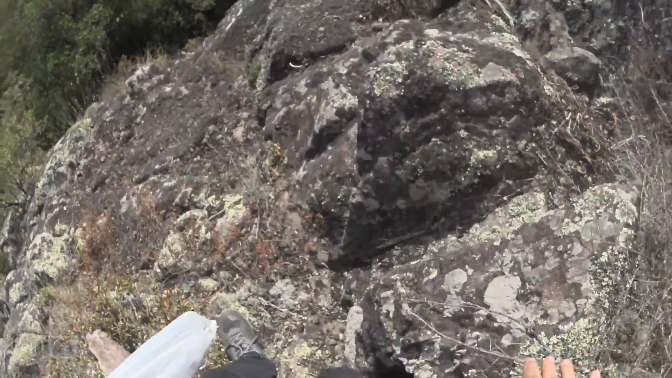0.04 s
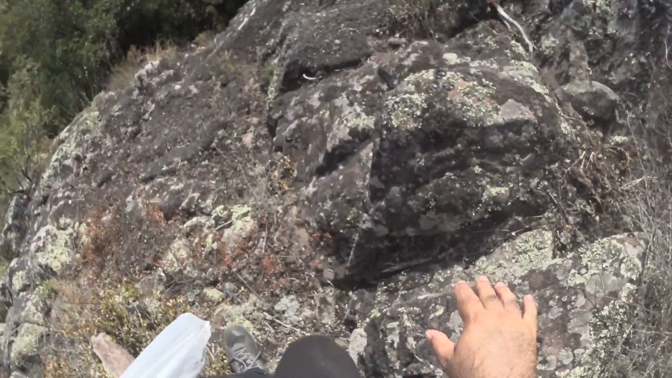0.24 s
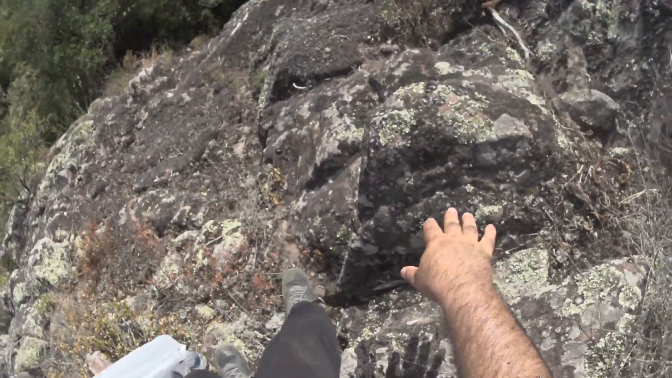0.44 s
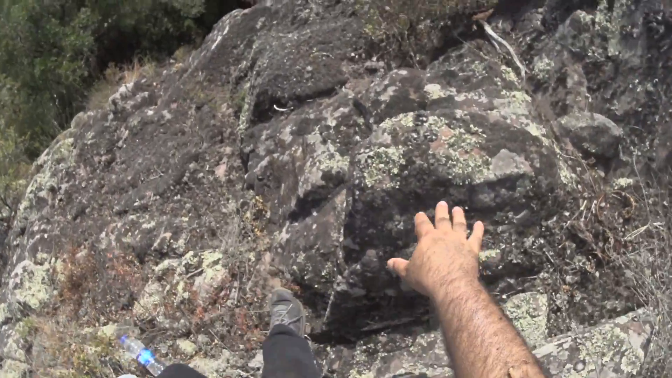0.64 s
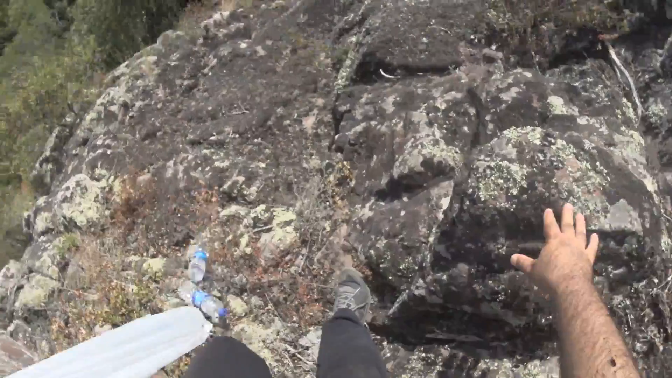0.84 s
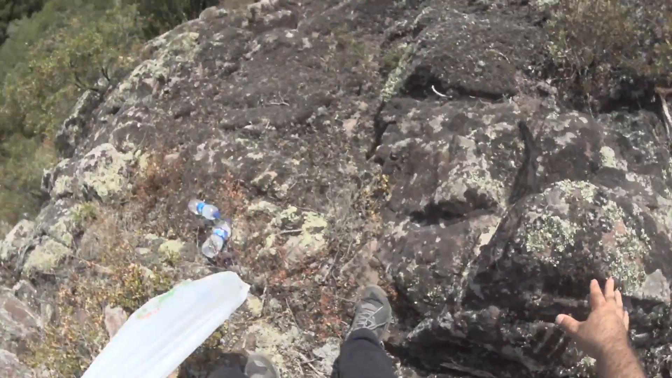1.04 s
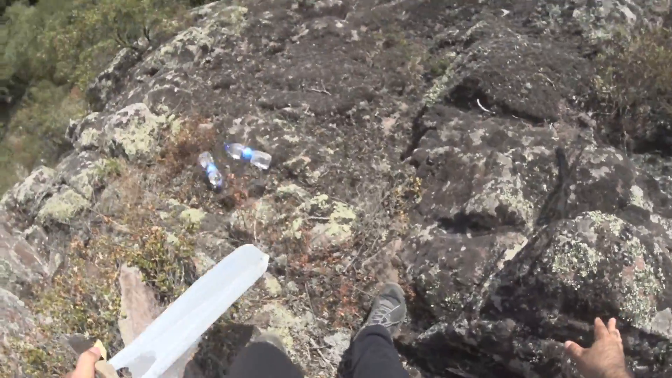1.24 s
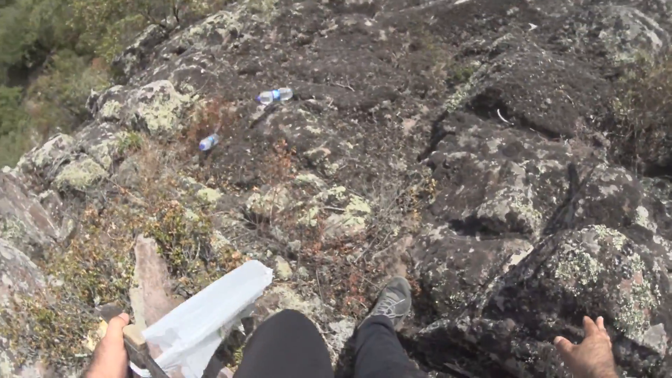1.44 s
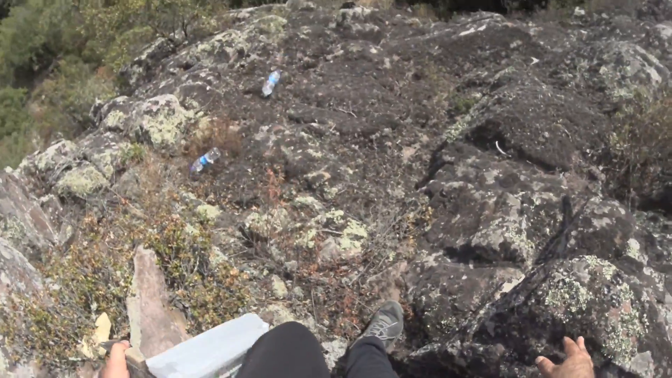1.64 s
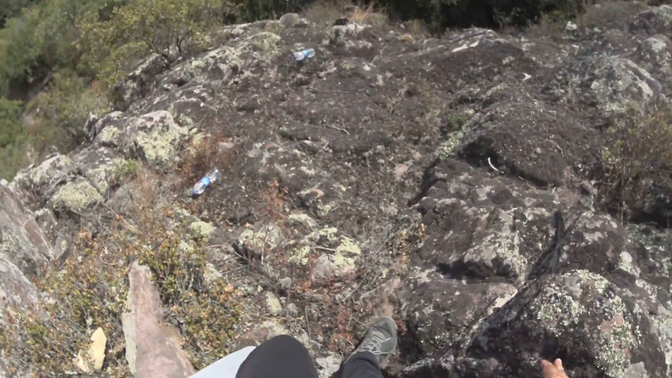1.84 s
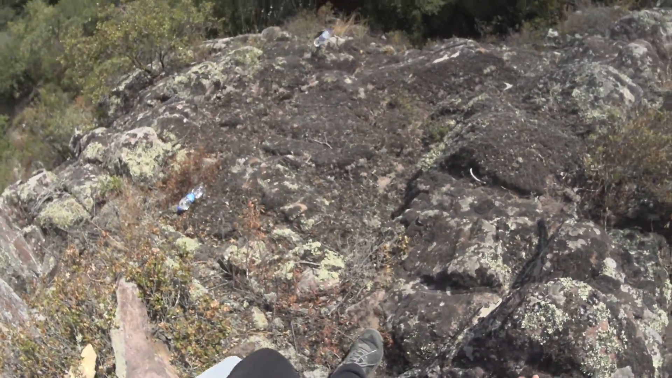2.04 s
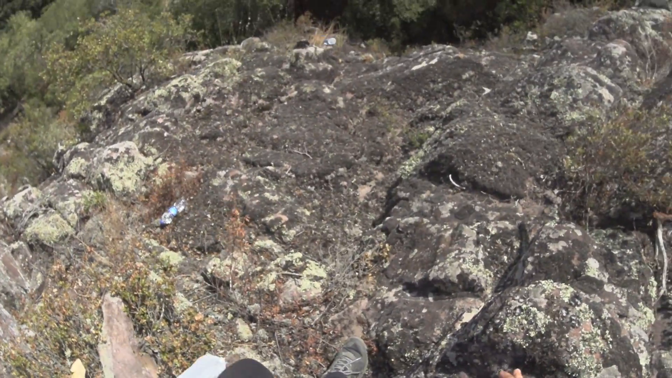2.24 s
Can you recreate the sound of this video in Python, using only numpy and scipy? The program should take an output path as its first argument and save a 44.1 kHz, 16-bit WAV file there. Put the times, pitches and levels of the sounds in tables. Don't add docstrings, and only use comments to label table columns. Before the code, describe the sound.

Empty plastic bottles tumble down rock, close to a small head-worn microphone. Bag film crackles softly, then hollow knocks and creasing snaps cluster at 0.2-0.3 s, with a snap at 0.42. Denser rustle, scuffs and ringing panel pings run 0.65-1.2, sharpest crack near 1.13. A clack at 1.45, then separate bounces around 1.7 and 1.95 fade into faint breeze and a distant drone, with short rock echoes.

```python
import sys
import numpy as np
from scipy import signal
from scipy.io import wavfile
from scipy.ndimage import uniform_filter1d

SR = 44100
rng = np.random.default_rng(int(sys.argv[2]) if len(sys.argv) > 2 else 0)


def field_ratio(decibels):
    return 10 ** (np.asarray(decibels, dtype=float) / 20)


def transcribe(u):
    v = np.clip(np.atleast_2d(u).T, -1, 1)
    q = np.round(v * 32767).astype(np.int16)
    wavfile.write(sys.argv[1], SR, q)


N = 101430

# (frequency [Hz], level [dB])
GRIT_COLOUR = [(50, -22), (150, -34), (400, -2.5), (1300, -5.5), (2300, -5.5), (5000, -4), (10500, -5)]


def evened(x):
    return x / np.sqrt(np.mean(x ** 2) + 1e-20)


def read(points, hz):
    f, value = np.transpose(points)
    return np.interp(np.log(hz + 1), np.log(f + 1), value)


def level(curve):
    s, db = np.transpose(curve)
    return field_ratio(np.interp(np.arange(N) / SR, s, db))


def add(mix, s, sound):
    part = mix[round(s * SR):][:len(sound)]
    part += sound[:len(part)]


def colour(x, points):
    log_gain = np.log(field_ratio(read(points, abs(np.fft.fftfreq(4096, 1 / SR)))))
    minimum_phase = np.exp(np.conj(signal.hilbert(log_gain)))
    taps = np.fft.ifft(minimum_phase).real[:2048]
    return signal.oaconvolve(x, taps)[:len(x)]


def resonate(x, hz, width_hz):
    r = np.exp(-np.pi * width_hz / SR)
    gain = (1 - r * r) / 2
    return signal.lfilter([gain, 0, -gain], [1, -2 * r * np.cos(2 * np.pi * hz / SR), r * r], x)


def resonate_twice(x, hz, width_hz):
    return resonate(resonate(x, hz, width_hz), hz, width_hz)


def treble(x, db):
    high = signal.lfilter(*signal.butter(2, 4500, "high", fs=SR), x)
    return x + (field_ratio(db) - 1) * high


def crackle(per_s, spread_db, smooth):
    happens = np.clip(per_s - rng.random(N) * SR, 0, 1)
    size_db = spread_db * np.minimum(rng.exponential(1, N), 4)
    clicks = happens * field_ratio(size_db) * rng.standard_normal(N)
    hiss = rng.standard_normal(N)
    drift = uniform_filter1d(uniform_filter1d(rng.standard_normal(N), size=90), size=90)
    clumps = field_ratio(1.9 * evened(drift))
    return evened((evened(clicks) + smooth * hiss) * clumps)


def knocks():
    # (time [s], level [dB], pitch [Hz], time to fall 60 dB [s])
    blows = [(.165, -42, 1024, 0.066), (0.2001, -29, 900, 0.033), (.2121, -33.5, 898.1, 0.036),
             (0.2273, -28, 980, 0.021), (.2395, -36, 950, 0.054), (.273, -33, 983, 0.058),
             (.408, -41.5, 425, 0.058), (0.4198, -36.5, 1115, .04), (.499, -43, 880, 0.037),
             (0.5008, -40.5, 481, 0.12), (.53, -49, 483, 0.079), (.641, -42.5, 710, 0.09),
             (.653, -40.5, 787, 0.057), (.666, -42, 600, .05), (.681, -36.5, 542, 0.072),
             (.696, -37, 962, 0.067), (0.7409, -40, 299, 0.13), (.7415, -34.5, 947, 0.054),
             (.915, -45.5, 564, 0.16), (0.926, -47.5, 215, 0.19), (.95, -44, 790, 0.071),
             (1.03, -39, 580, .06), (1.069, -35.5, 555, 0.063), (1.1218, -38.5, 1140, 0.16),
             (1.1228, -34, 409, 0.088), (1.181, -38, 988, 0.089), (1.183, -39, 190, 0.1),
             (1.225, -44.5, 803, 0.052), (1.261, -43, 1375, .05), (1.288, -42, 524, 0.095),
             (1.3, -55, 202, 0.16), (1.415, -43.5, 884, 0.11), (1.4515, -33.5, 1070, 0.068),
             (1.452, -37.5, 247, 0.073), (1.699, -46.5, 239, 0.17), (1.734, -40.5, 825, 0.1),
             (1.745, -40.5, 1290, 0.063), (1.79, -54.5, 201, 0.19), (1.835, -51, 840, 0.053),
             (1.944, -38.5, 878, 0.11), (1.946, -42, 267, 0.086), (1.99, -43, 557, 0.14),
             (2.02, -53, 230, 0.14)]
    out, t = np.zeros(N), np.arange(8000) / SR
    for s, db, hz, t60 in blows:
        fall = field_ratio(-60 * t / t60) * (1 - np.exp(-t * hz / 1.17))
        smear = evened(resonate_twice(rng.standard_normal(len(t)), hz, 0.66 * hz))
        clean_share = 0.8 + 50 * t60 ** 2
        ring = clean_share * np.sin(2 * np.pi * hz * t)
        strength = field_ratio(db) * np.sqrt(np.mean(fall ** 2))
        add(out, s, strength * evened(fall * (ring + smear)))
    return out


def pings():
    # (time [s], peak level [dB], pitch [Hz], time to fall 60 dB [s])
    flicks = [(0.2703, -32, 2750, 0.015), (0.2725, -36, 3410, 0.031), (.3003, -31, 2700, 0.019),
              (.495, -39.5, 1027, 0.08), (0.697, -38, 2730, 0.033), (.711, -38, 2480, 0.026),
              (0.741, -35, 2850, 0.015), (.7455, -28.5, 3670, 0.032), (0.756, -31.5, 1150, 0.058),
              (.858, -36, 2200, 0.036), (0.876, -36, 2080, .04), (0.89, -29.5, 2880, 0.027),
              (0.906, -30.5, 2140, 0.027), (.913, -26, 1970, 0.018), (0.928, -35, 2800, .02),
              (1.067, -27.5, 3010, 0.016), (1.08, -30, 2120, 0.038), (1.121, -25, 2017, 0.06),
              (1.184, -38.5, 1066, 0.056), (1.454, -26, 2155, .04), (1.697, -33, 1646, 0.04),
              (1.699, -30.5, 2310, 0.04), (1.7287, -28, 3150, 0.033), (1.7366, -28.5, 3080, 0.022),
              (1.857, -51, 1950, 0.023), (1.9217, -45, 6730, 0.018), (1.94, -35.5, 2420, 0.015),
              (1.948, -33.5, 2156, 0.024), (1.9858, -28.5, 2390, .035), (1.992, -31.5, 2477, 0.026),
              (2.004, -26.5, 1970, 0.02), (.2, -36, 3520, 0.021), (0.242, -38, 1936, 0.044)]
    rise_s, sharpness, rough_share = 0.0008, 4.5, 0.9
    out, t = np.zeros(N), np.arange(3000) / SR
    for s, db, hz, t60 in flicks:
        rough = evened(resonate_twice(rng.standard_normal(len(t)), hz, hz / sharpness))
        swell = field_ratio(db - 60 * t / t60) * (1 - np.exp(-t / rise_s))
        add(out, s, swell * (np.sin(2 * np.pi * hz * t) + rough_share * rough))
    return out


def scuffs():
    # (time [s], length [s], level [dB], ring pitch [Hz], treble [dB])
    drags = [(0.266, 0.011, -53, 3140, -8), (0.295, 0.007, -56, 2780, -6.5),
             (0.306, 0.027, -52.5, 3200, 2.5), (0.482, 0.022, -51.5, 3820, 1),
             (0.685, 0.027, -49.5, 2640, -7), (0.713, 0.014, -58.5, 2600, -13),
             (0.735, 0.021, -46, 2220, 2), (0.846, 0.014, -49.5, 2160, 11), (0.87, 0.032, -46.5, 2580, -1),
             (0.898, 0.025, -51.5, 2160, 6.5), (1.057, 0.027, -42.5, 2300, -1.5),
             (1.114, 0.017, -40, 2220, 6.5), (1.175, 0.023, -50, 2770, -10), (1.273, 0.017, -53, 2500, 6.5),
             (1.285, 0.016, -63, 4500, -10), (1.373, 0.031, -54, 2390, 0.5),
             (1.446, 0.014, -42.5, 2150, -6), (1.485, 0.028, -53, 6050, 9.5), (1.693, 0.01, -51, 1710, 2.5),
             (1.703, 0.012, -57.5, 2160, -22), (1.723, 0.0088, -47.5, 3130, -2.5),
             (1.731, .008, -49, 1940, 1.5), (1.844, 0.013, -64.5, 2020, 2), (1.934, 0.026, -51.5, 1890, -4),
             (1.98, 0.011, -51, 2240, -6), (1.994, 0.0076, -52.5, 1720, 1.5)]
    # (frequency [Hz], width [Hz], level [dB])
    wall_modes = [(1115, 106, 2), (1965, 2100, 1), (2630, 100, 1), (4150, 400, -7.5), (5500, 240, -13),
                  (5910, 510, -12)]
    rise_s, rise_share, release_t60_s = 0.0031, 0.14, 0.039
    wall_db, ring_db = -1, 1
    out, grit = np.zeros(N), crackle(per_s=8300, spread_db=2.0, smooth=0.66)
    for s, length, db, hz, treble_db in drags:
        t = np.arange(0, length + 0.052, 1 / SR)
        rise = np.minimum(t / (rise_s + rise_share * length), 1) ** 2
        release = field_ratio(-60 * np.maximum(t - length, 0) / release_t60_s)
        drive = grit[round(s * SR):][:len(t)] * rise * release
        wall = sum(field_ratio(mode_db) * resonate(drive, f, width) for f, width, mode_db in wall_modes)
        scrape = treble(colour(drive, GRIT_COLOUR) + field_ratio(wall_db) * wall, treble_db)
        sound = scrape + field_ratio(ring_db) * resonate(drive, hz, 440.0)
        add(out, s, field_ratio(db) * evened(sound) * np.sqrt(len(t) / (length * SR)))
    return out


def rolling():
    # (time [s], level [dB])
    strength = [(0, -57), (.4, -58.5), (.7, -52), (1.0, -51.5), (1.4, -53.5), (1.7, -64.5), (2.3, -63)]
    # (frequency [Hz], level [dB])
    tone = [(60, -23), (150, -3.5), (250, 2), (550, 3), (1000, 4), (1500, -5), (3000, -42)]
    return level(strength) * evened(colour(crackle(per_s=600, spread_db=2.5, smooth=1.8), tone))


def snaps():
    # (time [s], peak level [dB], centre pitch [Hz])
    creases = [(.066, -30.5, 2640), (0.084, -36, 2700), (0.1642, -32, 2970), (0.19, -29, 3220),
               (0.1997, -21.5, 2720), (0.211, -24.5, 4170), (0.225, -30, 1820), (0.239, -26.5, 2040),
               (0.2709, -31, 2960), (0.3002, -39, 3400), (0.359, -32.5, 3200), (0.381, -32.5, 7000),
               (0.405, -26, 2470), (0.4182, -19, 2630), (0.451, -41, 3780), (.567, -37.5, 3780),
               (0.632, -32.5, 6900), (0.676, -28, 6100), (.682, -25.5, 3380), (.835, -34, 8500),
               (0.894, -22, 6400), (0.905, -23, 3860), (1.027, -23, 7960), (1.1278, -10, 2550),
               (1.141, -27, 2850), (1.283, -29, 6540), (1.377, -30.5, 7550), (1.469, -28, 7950),
               (1.8302, -33.5, 4200), (1.921, -44, 4000), (1.8297, -32, 10300), (1.829, -40.5, 2020),
               (1.866, -41.5, 5500), (1.775, -46, 4800), (.191, -32, 2580), (1.543, -42, 5600),
               (2.06, -50.5, 8000), (1.303, -42, 5500), (1.311, -39.5, 5000), (1.227, -42, 4500),
               (1.4526, -24, 3500)]
    rattle_t60_s, sharpness = 0.004, 0.87
    out, t = np.zeros(N), np.arange(1200) / SR
    tick = 3.8 * np.exp(-((t - 0.0004) / 0.00004) ** 2)
    rise = np.minimum(t / 0.00056, 1)
    fall = field_ratio(-60 * np.maximum(t - 0.0025, 0) / rattle_t60_s)
    for s, db, hz in creases:
        drive = colour((rng.standard_normal(len(t)) + tick) * rise * fall, GRIT_COLOUR)
        edge = field_ratio(-13.0) * np.gradient(drive)
        sound = edge + resonate_twice(drive, hz, hz / sharpness)
        add(out, s, field_ratio(db) * sound / abs(sound).max())
    return out


def rustle():
    # (time [s], level [dB])
    effort = [(0, -57), (.15, -51), (.25, -45.5), (.44, -46.5), (.53, -52.5), (.59, -57), (.63, -44.5),
              (.69, -43), (.79, -49), (.84, -41), (.95, -44.5), (1.04, -43), (1.24, -54.5), (1.55, -50),
              (1.65, -59), (1.8, -55), (1.9, -61.5), (2.1, -67.5)]
    # (frequency [Hz], level [dB])
    film = [(300, -33), (1300, -5.5), (2500, 2), (4500, -2.5), (7500, -3), (10800, -6)]
    return level(effort) * evened(colour(crackle(per_s=1500, spread_db=4.5, smooth=2.2), film))


def slope(x, t60):
    taps = np.zeros(4400)
    at = np.arange(20, 4370, 22) + rng.integers(0, 22, 198)
    taps[at] = rng.choice([-1., 1.], 198) * field_ratio(-60 * at / SR / t60)
    return signal.oaconvolve(x, taps / np.linalg.norm(taps))[:N]


def breeze():
    # (frequency [Hz], level per Hz [dB])
    tone = [(25, 1.5), (100, -33), (230, -6), (800, -0.5), (1500, -2.5), (3500, -14.5), (11000, -29)]
    # (frequency [Hz], likeness [0 to 1])
    likeness = [(60, 0.47), (250, 0.25), (2000, 0.067)]
    frames, hz = N // 128 + 5, np.fft.rfftfreq(512, 1 / SR)
    a, b, c, d, patches = rng.standard_normal((frames, 257, 5)).T
    patches = uniform_filter1d(uniform_filter1d(patches, size=6, axis=0), size=16, axis=1)
    patch_db = (-0.1 + 4.2 * np.exp(-hz / 120)[:, None]) * evened(patches)
    same = np.clip(read(likeness, hz), -1, 1)[:, None]
    left = a + 1j * b
    right = same * left + np.sqrt(1 - same ** 2) * (c + 1j * d)
    z = np.array([left, right]) * field_ratio(read(tone, hz)[:, None] + patch_db)
    wind = signal.istft(z, nperseg=512, noverlap=384)[1][:, :N]
    return field_ratio(-59.5) * evened(wind)


def drone():
    # (time [s], level [dB])
    swell = [
        (0, -69),
        (1.2, -80),
        (1.6, -74.5),
        (2.3, -66),
    ]
    hz = 721.4
    note = np.sqrt(2) * np.sin(2 * np.pi * hz * np.arange(N) / SR)
    waver = 0.27 * evened(resonate(rng.standard_normal(N), hz, 12.0))
    return level(swell) * (note + waver)


def scene():
    direct = knocks() + pings() + scuffs() + rolling() + snaps() + rustle()
    ground_s, ground_db, slap_db, side_db, left_db = 0.00041, -11, -11.5, -15, 1.3
    bounced = np.roll(direct, round(ground_s * SR))
    near = direct + field_ratio(ground_db) * resonate(bounced, 1110.0, 670.0)
    mid = near + field_ratio(slap_db) * slope(near, 0.058)
    side = field_ratio(side_db) * treble(slope(near, 0.09), 1.3)
    left, right = (mid + side) * field_ratio(left_db / 2), (mid - side) / field_ratio(left_db / 2)
    return np.array([left, right]) + breeze() + drone()


def top_cut(x):
    return signal.sosfilt(signal.butter(12, 12330, fs=SR, output="sos"), x)


def record(dry):
    thin = signal.lfilter(*signal.butter(1, 120., "high", fs=SR), dry)
    low_pass = signal.firwin(135, 10980, window=("kaiser", 5), fs=SR)
    limited = signal.oaconvolve(thin, low_pass[None], "same")
    return top_cut(limited)


dry = scene()
out = record(dry)
transcribe(out)
```